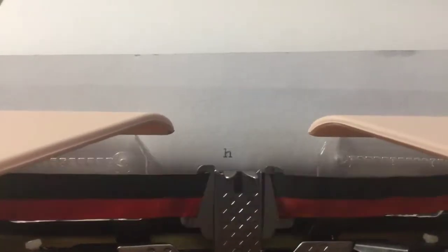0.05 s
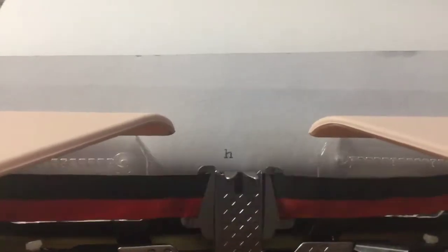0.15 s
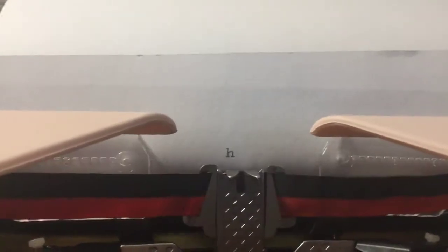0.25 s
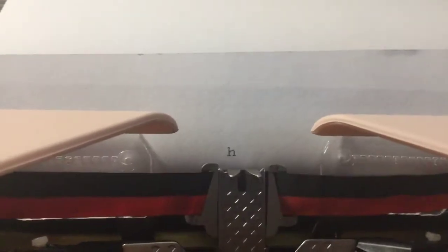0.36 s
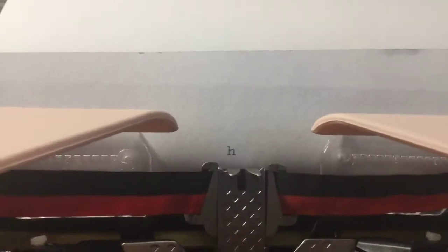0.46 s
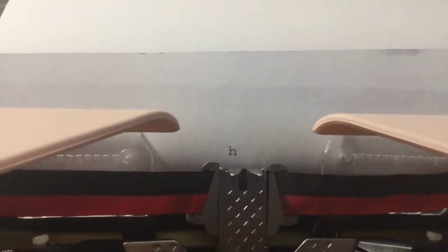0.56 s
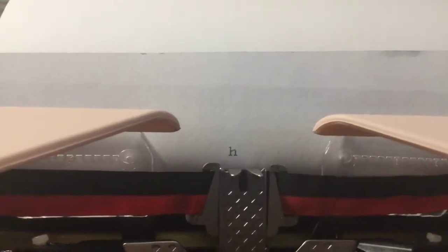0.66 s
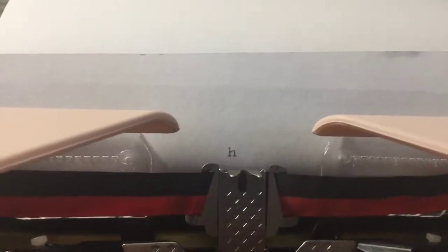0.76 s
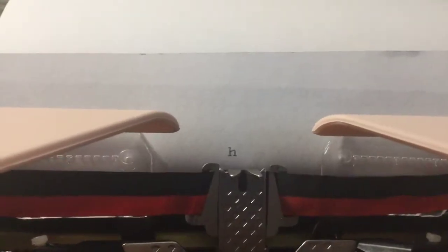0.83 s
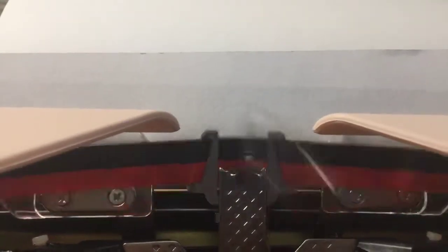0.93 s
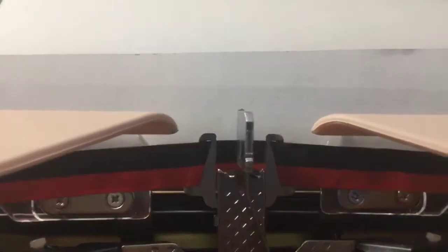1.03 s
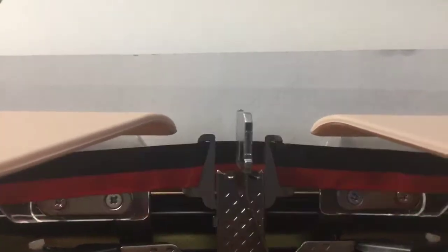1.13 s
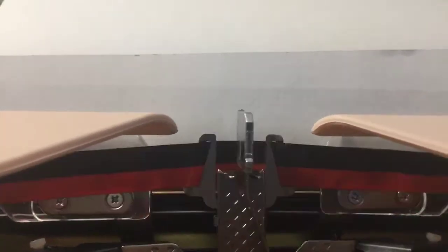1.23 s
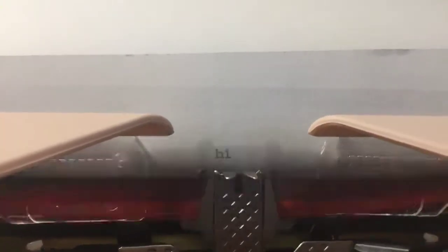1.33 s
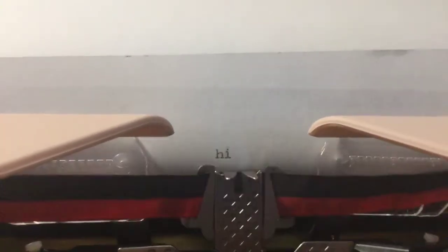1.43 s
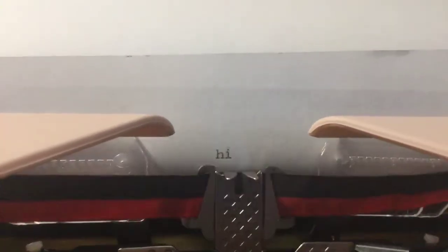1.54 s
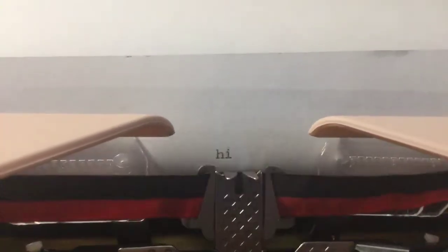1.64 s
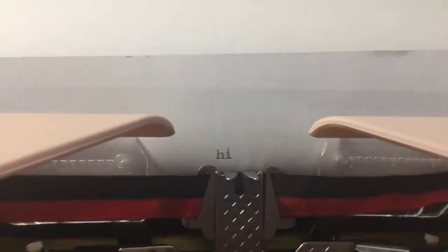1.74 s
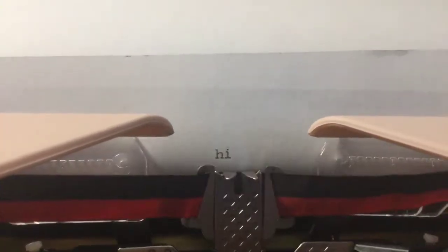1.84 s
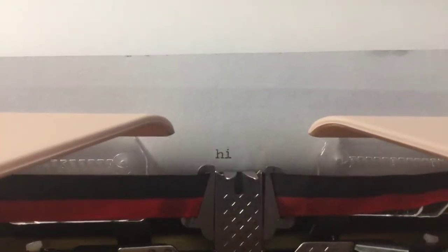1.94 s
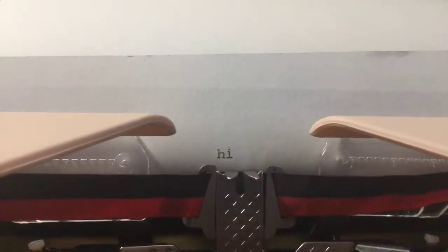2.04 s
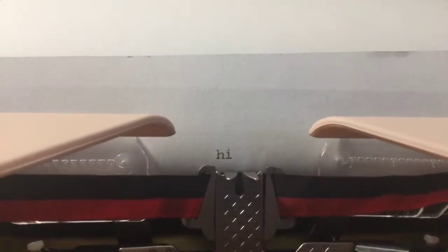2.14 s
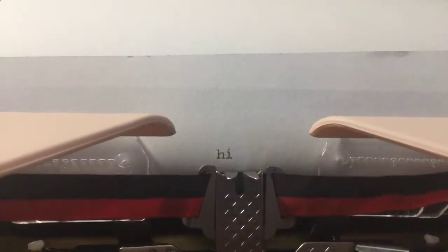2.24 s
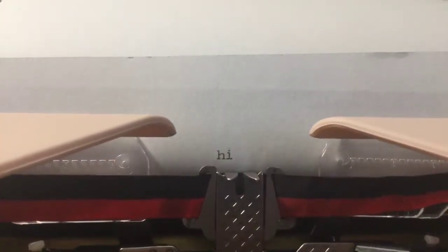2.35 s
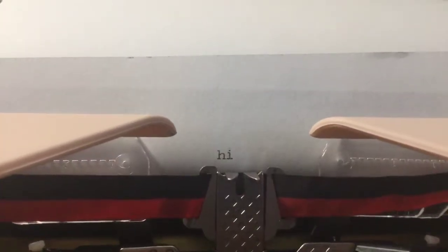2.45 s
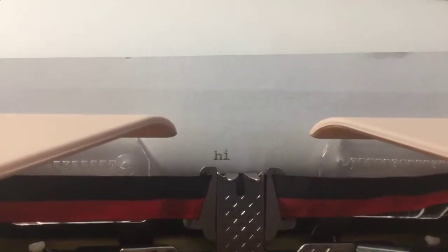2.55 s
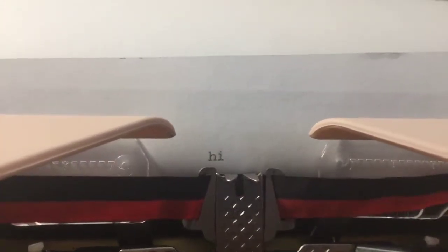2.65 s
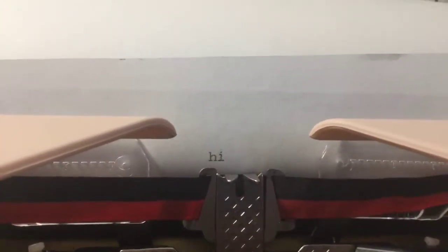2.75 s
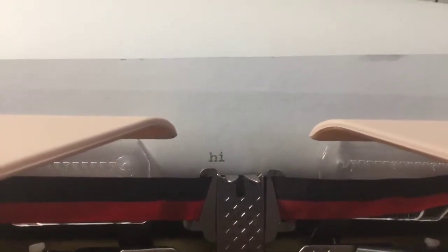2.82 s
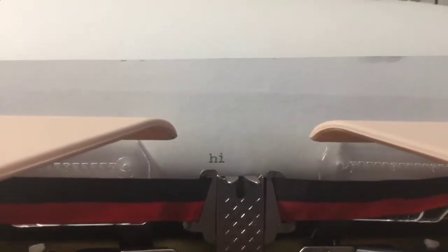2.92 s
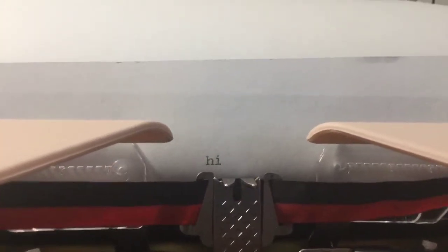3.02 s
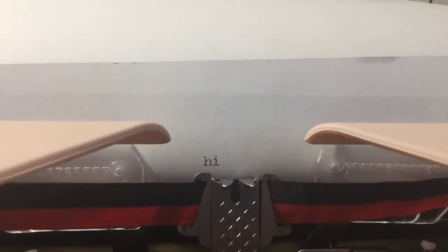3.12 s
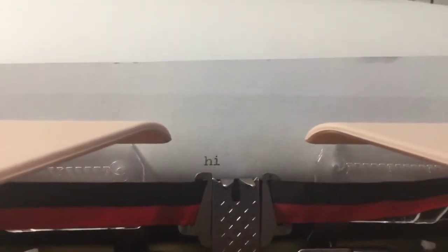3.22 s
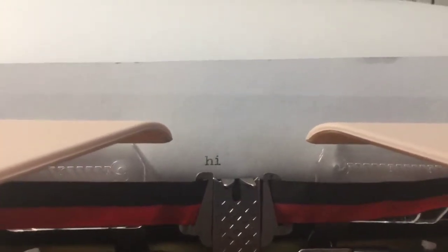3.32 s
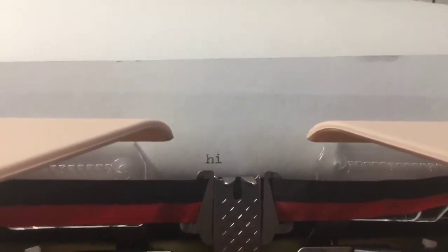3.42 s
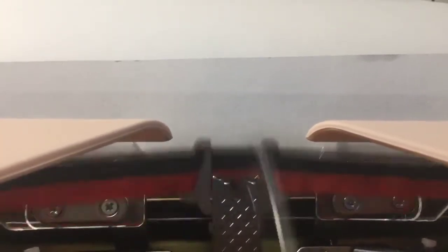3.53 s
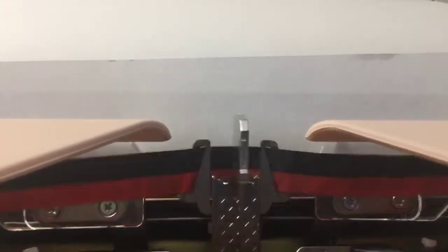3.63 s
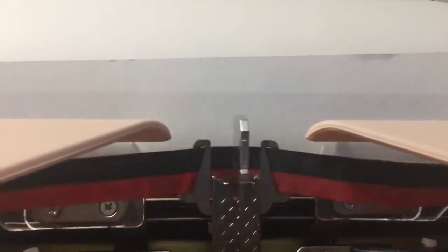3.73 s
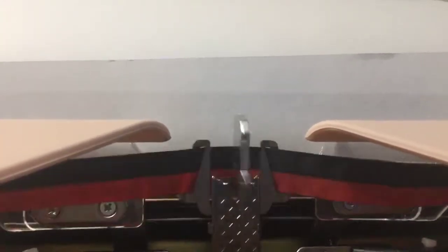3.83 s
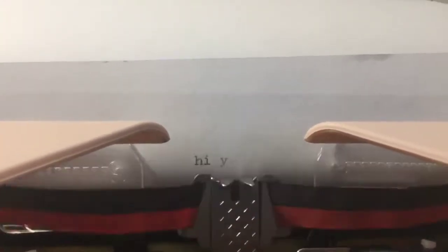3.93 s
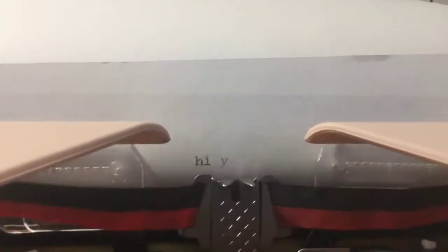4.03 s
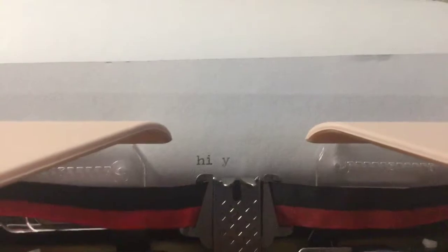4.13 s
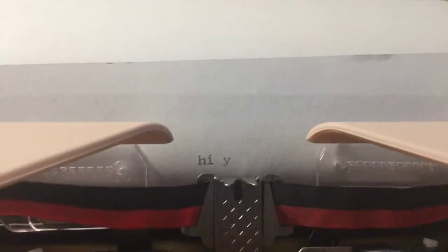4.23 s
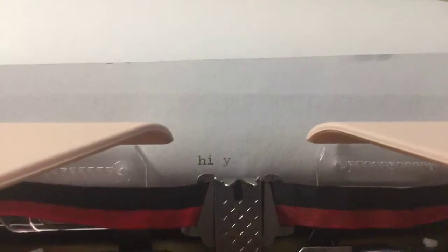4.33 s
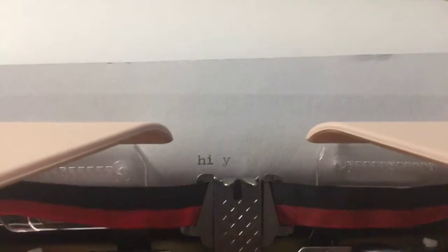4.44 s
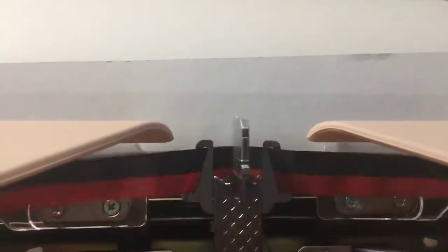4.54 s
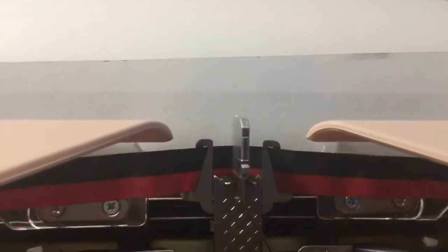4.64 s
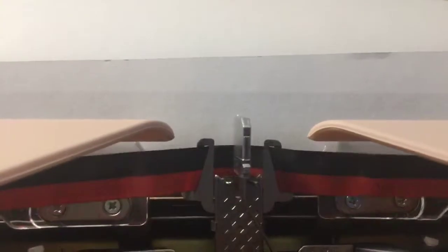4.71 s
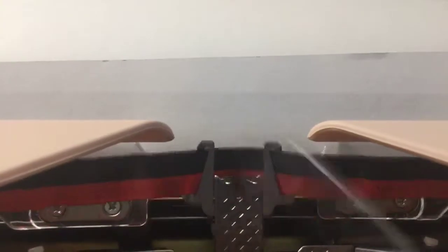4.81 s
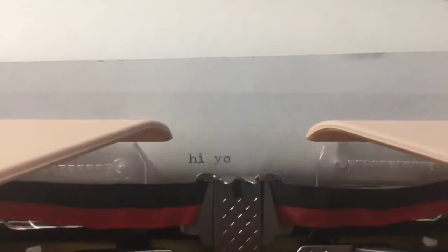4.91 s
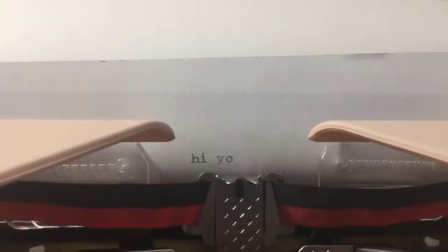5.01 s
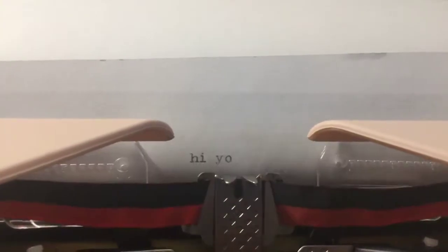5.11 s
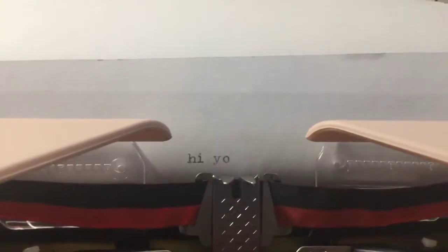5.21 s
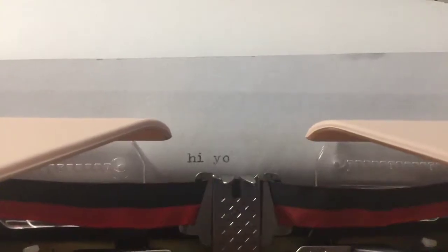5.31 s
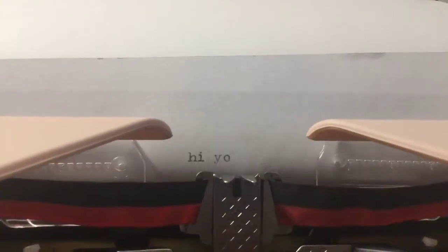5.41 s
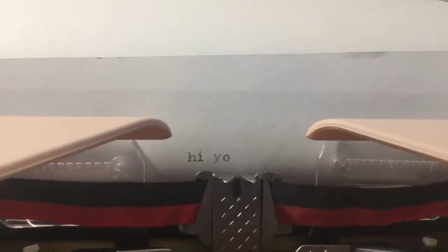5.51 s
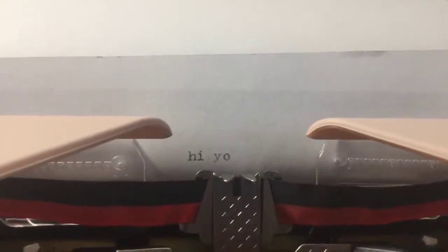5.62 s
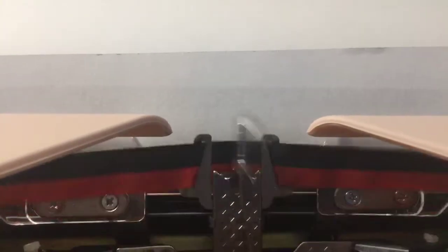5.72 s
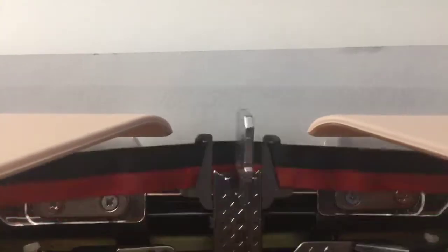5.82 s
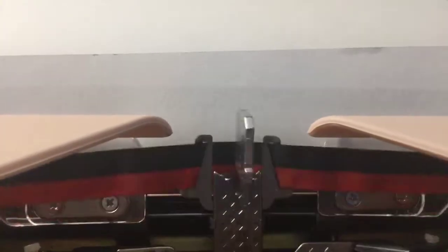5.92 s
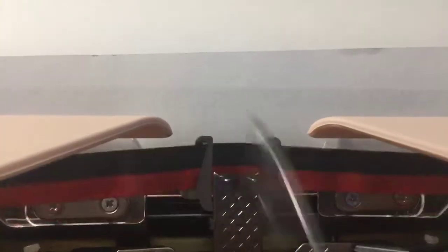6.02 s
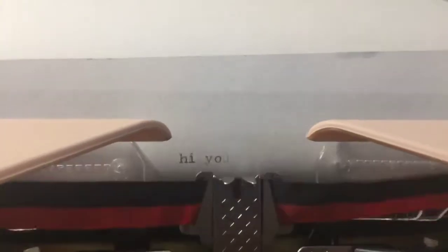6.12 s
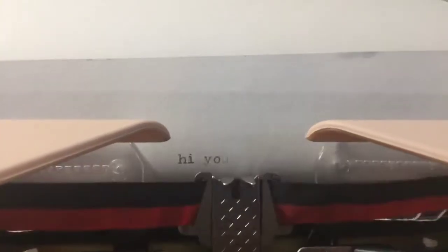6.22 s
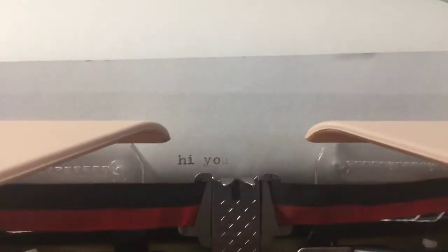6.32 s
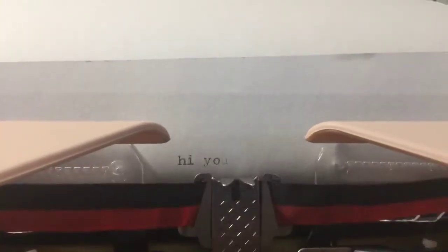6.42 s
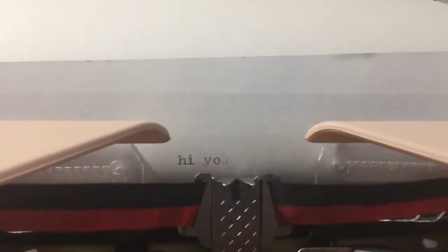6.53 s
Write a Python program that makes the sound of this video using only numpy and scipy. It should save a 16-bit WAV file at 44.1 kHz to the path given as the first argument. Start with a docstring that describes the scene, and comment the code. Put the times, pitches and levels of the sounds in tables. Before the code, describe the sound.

Slow single key strikes on an old mechanical typewriter, crisp steel clacks and clattering releases, dull thuds, small clicks, a soft metallic ring after.

```python
"""A key bar thuds onto its padded rest and bounces over a faint hush, and the frame rings on; then a manual
typewriter is typed slowly, a hand's width from a phone in a quiet room. A key press is a train of metal contacts,
noise bursts, up to the blow on the platen; a release ends in a landing. Thuds are short sagging sines, knocks are
low noise, frame and carriage ring as decaying sines, the table hums, loose parts rattle as half-octave noises,
and a few scuffs are grainy noise."""
import sys
import numpy as np
from scipy import signal
from scipy.fft import rfft, irfft
from scipy.io import wavfile

SR = 44100
rng = np.random.default_rng(int(sys.argv[2]) if len(sys.argv) > 2 else 0)


def to_wav(sig):
    """Store sig (one row per channel, or 1-D mono) as 16-bit WAV at the path in sys.argv[1].

    Samples outside -1..1 are clipped; the rate is SR.
    """
    pcm = np.clip(np.atleast_2d(sig), -1, 1) * 32767
    pcm = np.round(pcm).astype(np.int16)
    wavfile.write(sys.argv[1], SR, pcm.T)  # frames by channels


N = 289296


def undb(db):
    """dB to amplitude."""
    return 10 ** (np.asarray(db) / 20)


def fade(t, t60_s):
    """Exponential decay, down 60 dB after t60_s."""
    return np.exp(-np.log(1000) * t / t60_s)


def hold(t, hz):
    """Tails hold a while and then drop away, the high ones first."""
    hold_s = .68 * (1000 / hz) ** .42
    return 1 / (1 + (t / hold_s) ** 4)


def band(x, lo_hz, hi_hz):
    """Bandpass."""
    edges_hz = [lo_hz, min(hi_hz, .45 * SR)]
    return signal.sosfilt(signal.butter(2, edges_hz, "bandpass", fs=SR, output="sos"), x)


def unit(x):
    """Scale to an RMS of 1."""
    return x / np.sqrt(np.mean(x ** 2))


def shaped(noise, burst):
    """Noise under an envelope, carrying the envelope's energy."""
    return unit(noise * burst) * np.sqrt(np.mean(burst ** 2))


def add(out, start_s, x):
    """Mix x into out, cut at both ends of the scene."""
    i = int(start_s * SR)
    x = x[max(-i, 0):N - i]
    out[max(i, 0):max(i, 0) + len(x)] += x


def ring(modes, t):
    """Decaying sines, each struck with its own random phase."""
    total = np.zeros(len(t))
    for (hz, db, t60_s), phase in zip(modes, rng.random(len(modes))):
        total += undb(db) * fade(t, t60_s) * hold(t, hz) * np.sin(2 * np.pi * (hz * t + phase))
    return np.tanh(t / 0.0052) * total


# Spectrum of the hush. Each row: frequency in Hz, relative density in dB per Hz.
ROOM_SPECTRUM = [(24, -56.5), (40, -24), (363, -3.5), (433, -13), (810, -37.5), (1090, -28), (1410, -48),
                 (16000, -52)]
ROOM_RMS_DB = -69


def room():
    """Faint steady hush: noise filtered to a fixed spectrum."""
    hz, db = np.transpose(ROOM_SPECTRUM)
    f = np.maximum(np.arange(N // 2 + 1) * SR / N, 1)
    gain = undb(np.interp(np.log(f), np.log(hz), db))
    return unit(irfft(rfft(rng.standard_normal(N)) * gain, N)) * undb(ROOM_RMS_DB)


# Key presses. Each row: slack taken up in seconds, level in dB, linkage stop in seconds, level in dB,
# bar enters the guide in seconds, level in dB, type on platen in seconds, level in dB,
# carriage ring level in dB, table hum level in dB.
PRESSES = [(0.9861, -27, 1.0372, -8, 1.0467, -7.5, 1.0598, -7.5, -29, -55.5),
           (3.61, -30, 3.6525, -7.5, 3.6613, -11, 3.6764, -5, -34.5, -52),
           (4.5716, -27, 4.6105, -10, 4.6189, -9, 4.6323, -4, -29, -54),
           (5.785, -33, 5.8246, -7.5, 5.8377, -13, 5.8556, -14, -34.5, -54.5)]
# Key releases. Each row: escapement in seconds, level in dB, bar landing in seconds, level in dB.
RELEASES = [(-0.02, -30, 0.0215, -8), (1.4191, -6.5, 1.4537, -11.5), (3.9801, -10.5, 4.0225, -7),
            (4.9047, -8.5, 4.9453, -7), (6.1506, -10, 6.2, -10)]
# The bar bouncing on its rest, and rocking over after the hard bounces. Each row: time in seconds, level in dB.
BOUNCES = [(0.0658, -10), (0.1305, -20.5), (0.1832, -25), (0.2158, -30), (0.2337, -36), (0.3254, -48),
           (4.0729, -14), (4.1508, -26), (6.2477, -15), (6.3307, -41)]
ROCKS = [(0.07, -10.5), (4.0761, -12), (6.2511, -12)]
# Contacts that make up each move. Each row: lag in ms, level in dB relative to the move, nominal ring in Hz,
# relative treble in dB, rise from half amplitude in ms, decay t60 in ms.
SLACK_CONTACTS = [(0, 0, 14000, -5, 1.8, 22), (11, -3, 13600, -3, 3, 40), (25, -6, 13400, -4, 3, 30)]
STOP_CONTACTS = [(-15, -24, 1500, -14, 1.5, 20), (0, 0, 1770, -12, 1.4, 24), (5.5, -9, 3500, -3, 2, 14)]
GUIDE_CONTACTS = [(0, 0, 10500, -1, 0.8, 16)]
TYPE_CONTACTS = [(0, 0, 4200, -11, 1, 20), (8, -6, 4300, -2, 3.5, 18), (22, -19, 1400, -14, 2, 20)]
ESCAPEMENT_CONTACTS = [(-8, -26, 6000, -6, 3, 40), (0, 0, 5500, -5, 0.85, 20), (13, -7, 5900, -10, 1.4, 20)]
LANDING_CONTACTS = [(-13, -4, 11500, -4, 2.2, 24), (-5, -1, 13000, -2, 2.4, 28),
                    (-4.5, -4, 3270, -8, 1.3, 30), (0, 0, 6200, -4, 2.6, 24), (3.5, -5, 11000, -1, 3, 24),
                    (16, -12, 5000, -9, 2, 28)]
BOUNCE_CONTACTS = [(0, 0, 3270, 3, 0.75, 18)]
ROCK_CONTACTS = [(0, 0, 6500, -1.5, 0.8, 13)]
# Knocks through the case with a move; the type's follows the carriage ring's level.
# Each row: lag in ms, level in dB relative to the level it follows, pitch in Hz.
SLACK_KNOCKS = [(8, -10, 560)]
TYPE_KNOCKS = [(-3, 13, 540)]
ESCAPEMENT_KNOCKS = [(4, -23, 690), (12, -16, 212)]


def moves():
    """Each move of the mechanism as (contacts, knocks, times and levels)."""
    press, release = np.array(PRESSES), np.array(RELEASES)
    return [(SLACK_CONTACTS, SLACK_KNOCKS, press[:, 0:2]),
            (STOP_CONTACTS, [], press[:, 2:4]),
            (GUIDE_CONTACTS, [], press[:, 4:6]),
            (TYPE_CONTACTS, [], press[:, 6:8]),
            ([], TYPE_KNOCKS, press[:, [6, 8]]),
            (ESCAPEMENT_CONTACTS, ESCAPEMENT_KNOCKS, release[:, 0:2]),
            (LANDING_CONTACTS, [], release[:, 2:4]),
            (BOUNCE_CONTACTS, [], BOUNCES),
            (ROCK_CONTACTS, [], ROCKS)]


# Single clicks of fingers, levers and the space bar.
# Each row: time in seconds, level in dB, ring in Hz, relative treble in dB, decay t60 in ms.
CLICKS = [(0.0517, -21, 12600, 0, 46), (0.8823, -52, 1350, -34, 20), (0.9131, -26.5, 12400, -8.5, 18),
          (1.0559, -14, 4260, -13, 16), (1.2658, -46, 1510, -33, 18), (1.3334, -40.5, 1210, -51, 16),
          (1.3911, -27.5, 8300, -5, 30), (1.441, -20, 1980, 4, 30), (1.5048, -17.5, 10530, 1, 16),
          (1.7211, -59, 6700, 5, 30), (1.862, -45, 3035, -35, 28), (1.9432, -39, 1490, -23, 24),
          (1.9631, -50, 1190, 1, 30), (2.202, -51, 6590, -12.5, 35), (2.5773, -28, 4300, -4, 21),
          (2.6111, -14, 6270, -2, 30), (2.6347, -22, 2800, -22, 24), (2.7461, -12, 4710, -9, 11),
          (2.7638, -15, 5860, -9.5, 22), (2.8, -29.5, 5470, -10, 42), (2.8187, -38, 8330, -11, 35),
          (2.8259, -36, 5490, -6, 26), (2.9265, -53, 8230, -5, 32), (3.0606, -53, 3170, -20, 30),
          (3.1397, -46.5, 2320, -40.5, 11), (3.3148, -57, 1700, -36, 28), (3.5479, -26.5, 14510, -2.5, 18),
          (3.7103, -29, 1360, -15, 36), (3.7373, -39, 2690, -13, 60), (4.335, -52, 1210, -2, 14),
          (4.348, -46.5, 6590, -11, 28), (4.3706, -43.5, 1530, -25, 30), (4.4117, -46, 2090, -1, 22),
          (4.4603, -46, 1210, -14, 16), (4.5256, -53, 1210, -19.5, 14), (4.5814, -30, 3770, 1.5, 40),
          (4.6025, -21, 3500, -3, 40), (4.8899, -31, 11090, -8, 24), (5.079, -44, 9700, 2, 8),
          (5.0922, -34.5, 13590, -6, 26), (5.1053, -43, 2840, -9, 20), (5.1765, -39, 2440, -5, 17),
          (5.2055, -17, 12700, 4, 13), (5.2619, -40, 9100, -1, 16), (5.418, -60, 1290, -21, 28),
          (5.4562, -54, 3170, -40, 18), (5.5108, -39.5, 14730, -1.5, 28), (5.638, -59, 2600, -40, 34),
          (5.776, -41, 1210, -1, 25), (5.8166, -27.5, 8600, -8, 13), (5.8576, -7, 12790, -15, 16),
          (5.8938, -30, 1490, -13, 30), (6.0922, -54, 6720, -5, 40), (6.1563, -18, 2830, -5, 40),
          (6.179, -21, 2110, -24.5, 12), (6.3357, -46, 1190, -18, 22), (6.4435, -48, 1164, -14, 20),
          (6.507, -47, 6570, -17, 28)]
RISE_SHARE = .065  # a click's rise as a share of its decay
SCATTER_DB, SCATTER_PITCH_SHARE = 1, .03  # standard deviations


def contact_rows():
    """Every contact as (s, dB, ring Hz, treble dB, rise ms, t60 ms); repeats of a move differ a little."""
    rows = [(s, db, hz, treble_db, RISE_SHARE * t60_ms, t60_ms) for s, db, hz, treble_db, t60_ms in CLICKS]
    for train, _, events in moves():
        for s, db in events:
            for lag_ms, rel_db, hz, *shape in train:
                chance = rng.standard_normal(2)
                level_db = db + rel_db + SCATTER_DB * chance[0]
                ring_hz = hz * (1 + SCATTER_PITCH_SHARE * chance[1])
                rows.append((s + lag_ms / 1000, level_db, ring_hz, *shape))
    return rows


def contacts():
    """Steel on steel: a swelling burst of micro-impacts (chatter) that rings one small part."""
    chatter, parts = np.zeros(N), np.zeros(N)
    t = np.arange(-SR // 40, SR // 10) / SR
    lead_in = undb(-19.5) * np.exp(t / 0.0065)  # a faint noise swells just before each contact
    for s, db, hz, treble_db, rise_ms, t60_ms in contact_rows():
        grit = rng.standard_normal((3, len(t)))
        rise = .5 ** ((1000 * t / max(rise_ms, .1)) ** 2)
        decay = fade(t, max(t60_ms, 3) / 1000)
        burst = undb(db) * np.where(t < 0, np.maximum(rise, lead_in), decay)
        top_hz = np.clip(8000 * undb(treble_db + 18), 1.4 * hz, 8000)  # soft contacts are dull throughout
        part = shaped(band(grit[0], hz / 1.08, hz * 1.08), burst) * undb(-5.5)
        middle = shaped(band(grit[1], 600, top_hz), burst) * undb(-6.5)
        treble = shaped(band(grit[2], 6600, 20000), burst) * undb(treble_db - 3)
        add(chatter, s + t[0], middle + treble)
        add(parts, s + t[0], part)
    return chatter, parts


# Single dull knocks through case and table. Each row: time in seconds, level in dB, pitch in Hz.
KNOCKS = [(0.33, -43.5, 269), (0.404, -47, 270), (0.884, -43, 538), (0.912, -39.5, 546), (1.33, -40.5, 301),
          (1.945, -37, 275), (2.117, -44.5, 301), (2.579, -34.5, 552), (2.634, -26, 208),
          (2.763, -20.5, 675), (3.298, -53.5, 286), (3.393, -50.5, 541), (3.468, -52.5, 547),
          (3.547, -50.5, 549), (4.415, -49, 243), (5.208, -33, 714), (5.458, -48, 292), (5.514, -42, 738),
          (5.936, -36, 315)]
THUD_KNOCK_REL_DB, THUD_KNOCK_HZ = -13, 340  # woody knock with each thud, relative to it


def knock_rows():
    """Every knock as (s, dB, Hz): single ones, those with thuds and those with moves."""
    rows = list(KNOCKS)
    rows += [(s, db + THUD_KNOCK_REL_DB, THUD_KNOCK_HZ) for s, db, *_ in THUDS]
    for _, train, events in moves():
        for s, db in events:
            rows += [(s + lag_ms / 1000, db + rel_db, hz) for lag_ms, rel_db, hz in train]
    return rows


def knocks():
    """Short wooden and plastic noise around one pitch."""
    out, t = np.zeros(N), np.arange(SR // 5) / SR
    envelope = (1 - np.exp(-t / .004)) * fade(t, 0.053)
    for s, db, hz in knock_rows():
        grit = unit(band(rng.standard_normal(len(t)), hz / 2.2, hz * 1.9))
        add(out, s, undb(db) * grit * envelope)
    return out


# Rattle of the whole machine after any contact. Each row: band in Hz, early relative level in dB,
# early t60 in seconds, late relative level in dB, late t60 in seconds before the hold.
RATTLE_BANDS = [(138.74, -22.5, 0.12, -57.5, 4.5), (269.4, -24.5, 0.17, -55, 4.2),
                (519, -23, .14, -61, 5.7), (1160, -25.5, 0.12, -56, 1.7), (2300, -22, 0.11, -63, 2),
                (4100, -22.5, 0.12, -59, 1.2), (5900, -36, .2, -61, .7), (7400, -28, .14, -56, 0.3),
                (12400, -25, 0.091, -66, .25)]


def rattle(hits):
    """Loose levers, springs and the table keep sounding: half-octave noises that die quickly, then slowly."""
    t, tail = np.arange(2 * SR) / SR, 0
    for hz, early_db, early_t60_s, late_db, late_t60_s in RATTLE_BANDS:
        early = undb(early_db) * fade(t, early_t60_s)
        late = undb(late_db) * fade(t, late_t60_s) * hold(t, hz)
        noise = unit(band(rng.standard_normal(len(t)), hz / 1.147, hz * 1.262))
        tail = tail + (early + late) * noise
    return signal.fftconvolve(hits, tail)[:N] * undb(-18.5)


# Bars landing on the padded rest, some twice.
# Each row: start in seconds, level in dB, starting pitch in Hz, length in cycles.
THUDS = [(.0176, -5, 270, 1.5), (.0237, -9, 225, 1.6), (1.4496, -8, 300, 1.5), (1.4572, -7, 225, 1.6),
         (4.0235, -6, 280, 2.1), (4.9395, -21, 260, 1.5), (4.951, -21, 260, 1.5), (6.2018, -4, 265, 1.9)]


def thuds():
    """A soft landing pushes the case for a cycle or two and the pad swallows it."""
    out = np.zeros(N)
    for s, db, hz, cycles in THUDS:
        turn = np.arange(int(1.4 * cycles * SR / hz)) * hz / SR
        sag = turn / (1 + .12 * turn)  # the pitch sags as the pad spreads
        envelope = np.sin(np.pi * np.minimum(sag / cycles, 1)) ** .6
        add(out, s, undb(db) * np.sin(2 * np.pi * sag) * envelope)
    return out


# Modes of the frame. Each row: frequency in Hz, relative level in dB, t60 in seconds before the hold.
FRAME_MODES = [(269, -8, 1.2), (603, -10, 2.5), (641, -8, 2.2), (727, -13, 2.5), (1066, -4.5, 2),
               (1104, 0, 2.2), (1141, 14, .1), (1820, -12, 1.5), (1868, -11, 2), (3182, -13, .8),
               (3408, -3, 1.3), (3483, -7, 1.3), (4823, -13, .8), (4953, -15, .8), (6530, -14, .8)]
# Landings and the space bar's step, which set the frame ringing. Each row: start in seconds,
# frame level in dB, relative level of its modes above 1500 Hz in dB, table hum level in dB.
SHOCKS = [(.02, -46, 3, -56), (1.452, -47, 0, -59), (2.765, -58, -14, -57), (4.024, -45, -2, -56),
          (4.945, -48, -12, -61), (6.202, -47, -7, -56)]


def frame_rings():
    """The frame's modes ring after each shock; the ring swells and lasts."""
    out, t = np.zeros(N), np.arange(2 * SR) / SR
    swell = 1 - .6 * np.exp(-t / .1)
    for s, db, high_db, _ in SHOCKS:
        modes = [(hz, level_db + high_db * (hz > 1500), t60_s) for hz, level_db, t60_s in FRAME_MODES]
        add(out, s, undb(db) * ring(modes, t) * swell)
    return out


TABLE_HZ = 134.5


def table_hum():
    """The table hums at one low pitch after shocks and type blows."""
    out, t = np.zeros(N), np.arange(2 * SR) / SR
    hum = np.sin(2 * np.pi * TABLE_HZ * t) * (1 - np.exp(-t / .06)) * fade(t, 2.2)
    for s, _, _, table_db in SHOCKS:
        add(out, s, undb(table_db) * hum)
    for *_, type_s, _, _, table_db in PRESSES:
        add(out, type_s, undb(table_db) * hum)
    return out


# Modes of the carriage. Each row: frequency in Hz, relative level in dB, t60 in seconds before the hold.
CARRIAGE_MODES = [(312, -9, 0.63), (1104, -11, 0.48), (1421, 0, 0.3), (1857, -17, 0.3), (2514, -12, 0.3),
                  (2697, -13, 0.21), (3408, -21, 0.42), (3483, -19, 0.44), (4258, -19, 0.3),
                  (5448, -16, 0.22), (5970, -26, 0.42), (7623, -8, 0.096)]


def carriage_rings():
    """The type's blow on the platen rings the carriage briefly."""
    out, t = np.zeros(N), np.arange(2 * SR) / SR
    for *_, type_s, _, ring_db, _ in PRESSES:
        add(out, type_s, undb(ring_db) * ring(CARRIAGE_MODES, t))
    return out


# Soft rustles of fingers and ribbon. Each row: start in seconds, length in seconds, level in dB, center in Hz.
SCUFFS = [(1.694, 0.058, -61.5, 5960), (1.935, 0.057, -62, 5040), (3.149, .13, -76, 4220),
          (3.273, 0.075, -68.5, 3480), (5.501, 0.029, -58, 4020)]


def scuffs():
    """Grainy rubbing: noise around one pitch, broken into uneven grains of about 3 ms."""
    out = np.zeros(N)
    for s, length_s, db, hz in SCUFFS:
        n = int(length_s * SR)
        grains = np.repeat(undb(2.6 * rng.standard_normal(n // 128 + 1)), 128)[:n]
        rub = unit(band(grains * rng.standard_normal(n), hz / 1.4, hz * 1.4))
        add(out, s, undb(db) * np.hanning(n) ** .5 * rub)
    return out


def scene():
    """All sources; contacts, knocks and thuds also shake the loose parts."""
    hush = room()
    chatter, parts = contacts()
    dull, push = knocks(), thuds()
    # narrow rings and padded thuds shake the loose parts less than broad chatter does
    shake = chatter + dull + undb(-13) * parts + undb(-27) * push
    rung = frame_rings() + table_hum() + carriage_rings()
    return (hush + chatter + parts + dull + rattle(shake) + push + rung + scuffs())[None]


TOP_HZ, CEILING = 16200, .95


def record(dry):
    """The phone drops the deep bass, rounds the loudest peaks and cuts the top."""
    x = signal.sosfilt(signal.butter(2, 30, "highpass", fs=SR, output="sos"), dry)
    rounded = CEILING * np.tanh(x / CEILING)
    return signal.sosfilt(signal.ellip(12, .2, 110, TOP_HZ, fs=SR, output="sos"), rounded)


dry = scene()
out = record(dry)
to_wav(out)
```